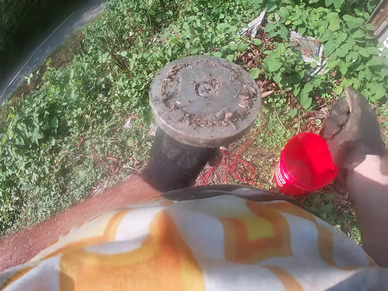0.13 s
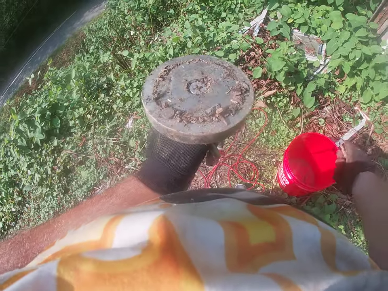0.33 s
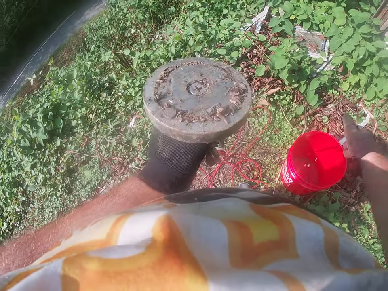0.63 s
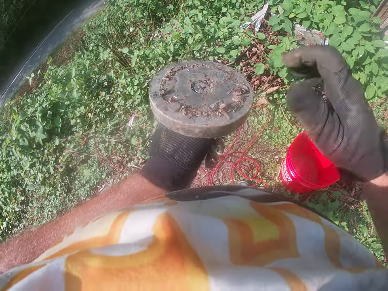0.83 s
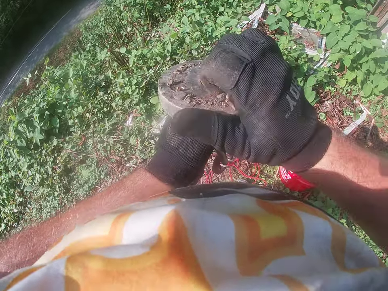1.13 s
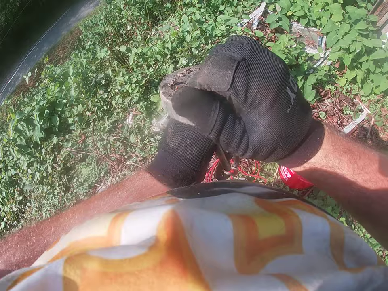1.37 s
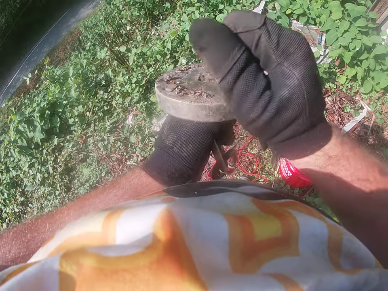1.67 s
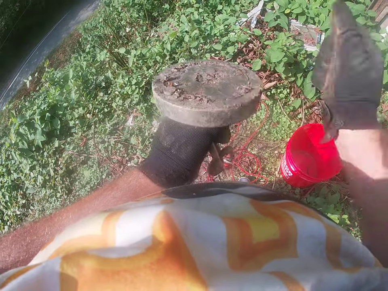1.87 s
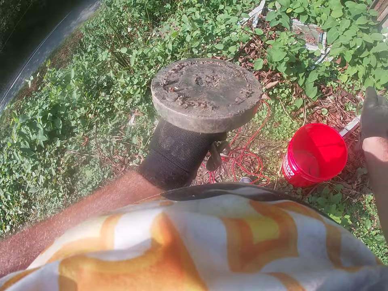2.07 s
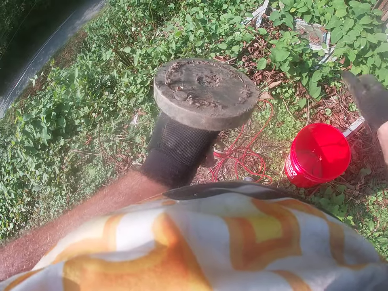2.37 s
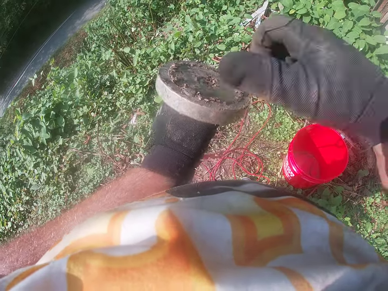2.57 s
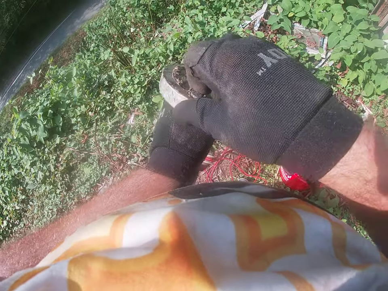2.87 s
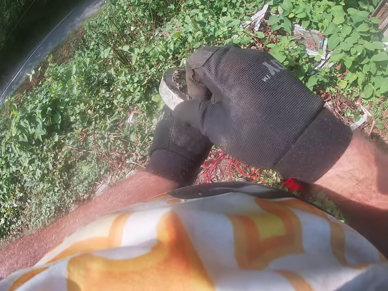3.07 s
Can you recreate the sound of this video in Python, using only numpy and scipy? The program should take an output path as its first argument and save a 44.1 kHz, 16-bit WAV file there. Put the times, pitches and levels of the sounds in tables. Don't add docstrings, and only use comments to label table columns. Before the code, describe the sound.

Metal scraps clattering into a plastic bucket. Wind thumps low on a body-worn microphone over faint distant traffic and leaves. At 0.5 s a brief scrape and bright ticks; at 0.8 s a handful hits with hard cracks and a short hollow ring, scattering until about 1.1 s. Soft gritty rasps and small clicks run 1.2-1.8 s, then a lull. Around 2.5 s a second handful crashes and bounces; stragglers tick until 3.15 s.

```python
import sys
import numpy as np
from scipy import signal
from scipy.fft import rfft, irfft
from scipy.io import wavfile
from scipy.ndimage import uniform_filter1d

SR = 44100
rng = np.random.default_rng(int(sys.argv[2]) if len(sys.argv) > 2 else 0)


def invert_db(level):
    return 10 ** (np.asarray(level, dtype=float) / 20)


def log_audio(samples):
    frames = np.atleast_2d(samples).T
    limited = np.clip(frames, -1, 1)
    pcm = np.round(limited * 32767).astype(np.int16)
    wavfile.write(sys.argv[1], SR, pcm)


N = 141120

# frequency in Hz, density in dB per Hz.
AIR_SPECTRUM = [(100, -10.5), (250, -4.5), (420, 4), (600, -4.5), (1200, -10), (2500, -15), (6000, -21),
                (10500, -19.5), (13000, -26.5)]
# time in seconds, level in dB.
GUST_LEVEL = [(0, -44), (.12, -34.5), (.3, -32), (.47, -35), (.68, -44.5), (.8, -25.5), (1.0, -39),
              (1.15, -36), (1.22, -57), (1.38, -52.5), (1.41, -43), (1.7, -29.5), (1.93, -35), (2.25, -34),
              (2.4, -32), (2.58, -35), (2.75, -25), (3.2, -50)]
# frequency in Hz, density in dB per Hz.
WIND_SPECTRUM = [(12, -33), (25, 5), (60, 1), (120, -6.5), (220, -15), (330, -26), (600, -58.5)]
# centre in seconds, peak in dB, pitch in Hz.
EDDIES = [(0.161, -14.5, 54), (0.181, -17.5, 121), (0.232, -23.5, 73.6), (0.282, -12.5, 78.4),
          (.304, -15, 122), (0.498, -20, 64), (0.517, -12, 121), (0.591, -23, 70), (0.821, -12.5, 128),
          (0.917, -20.5, 168), (0.941, -17, 57.6), (1.093, -25, 58), (1.542, -28.5, 94), (1.569, -23, 90),
          (1.65, -18.5, 109), (1.737, -14.5, 101), (1.78, -15.5, 62), (1.839, -19.5, 75.4),
          (1.965, -27.5, 203), (2.014, -19, 80), (2.127, -14.5, 143), (2.209, -19, 73), (2.301, -24, 180.6),
          (2.415, -25, 70), (2.657, -15, 156), (2.678, -16, 273), (2.722, -9, 76.4), (2.746, -14, 142),
          (2.765, -10.5, 71), (2.88, -20.5, 100), (3.13, -31.5, 46)]
# start in seconds, length in seconds, level in dB, brightness in dB.
STROKES = [(0.494, 0.02, -34, 2), (1.164, 0.14, -44.5, -1), (1.306, 0.12, -45.5, 4.5),
           (1.455, 0.1, -45, 0.5), (1.563, 0.24, -44.5, -6.5), (1.723, .12, -46.5, -2.5),
           (1.8, 0.22, -58, 5), (2.34, 0.41, -64, 13), (2.557, 0.156, -44.5, -11),
           (2.81, 0.042, -57.5, 9.5), (2.922, 0.035, -55.5, 16), (1.48, 0.042, -47.5, 8),
           (3.132, 0.041, -47, 8)]
# frequency in Hz, density in dB per Hz.
RASP_SPECTRUM = [(300, 7.5), (1000, -7.5), (1700, -7.5), (2700, 4), (4500, -1), (7000, -8), (9700, 0),
                 (12500, -1)]
# start in
# seconds, pitch in Hz, peak in dB, T60 in seconds.
PINGS = [(.4996, 2390, -25.5, 0.016), (.4996, 4900, -25.5, 0.022), (0.499, 7660, -28, .03),
         (.8125, 783, -13, 0.044), (.8464, 4530, -21, .015), (2.541, 630, -23, .04),
         (2.65, 1010, -29, 0.023), (2.7, 1010, -30.5, 0.026), (0.8116, 2690, -6.5, 0.013),
         (.8112, 7500, -9.5, 0.0063), (.8203, 7700, -19, 0.0092), (0.829, 7600, -26, 0.019),
         (.8494, 2900, -22, 0.013), (0.9537, 1214, -21.5, 0.034), (0.952, 3650, -22.5, 0.017),
         (1.3288, 2570, -36, 0.022), (1.4012, 5550, -34, 0.022), (1.678, 3830, -42, 0.011),
         (1.49, 8000, -45, .02), (2.482, 1520, -23.5, 0.032), (2.4816, 2550, -26, 0.03),
         (2.4812, 4680, -25.5, 0.025), (2.5299, 7420, -11.5, .008), (2.539, 2280, -5.5, .012),
         (2.589, 1610, -25, 0.029), (2.716, 6800, -43, 0.013), (2.787, 3500, -44, .015),
         (3.152, 1300, -34.5, 0.039), (3.154, 5500, -38, .02)]
# start in seconds, peak in dB,
# brightness in dB.
TICKS = [(0.4992, -21.5, 6), (0.4973, -25.5, 9.5), (0.5051, -25, 8), (.5118, -41, -1), (0.6907, -30.5, -10),
         (1.1726, -40, -7), (1.1762, -23, -9), (1.2268, -32, -5), (1.3, -24.5, -8), (1.3286, -19.5, -10),
         (1.364, -17.5, -16), (1.4016, -13, -17), (1.4602, -26, -16), (1.489, -30.5, -7), (1.508, -30.5, 4),
         (1.517, -32, -9), (1.3905, -46, -6), (1.181, -45, -4), (1.534, -28.5, -28), (1.6028, -27, -25),
         (1.6805, -26, -23), (1.72, -23, -29), (1.798, -30, -14), (2.481, -11.5, -10.5), (2.5224, -24, -7),
         (2.714, -30.5, -3.5), (2.722, -19.5, -12), (2.7856, -30, -24), (2.821, -29, -13),
         (2.8964, -53, 10), (2.925, -44, 5), (3.139, -33, -29), (3.1506, -26.5, -3.5)]
# frequency in Hz, density in dB per Hz.
METAL_SPECTRUM = [(300, -40), (900, 4.5), (1500, 0.5), (2800, 2.5), (3600, -3.5), (4500, -1), (6000, -8),
                  (15000, -1)]
# start in seconds, crack peak in dB, bucket ring in dB,
# brightness in dB, boom of the low modes in dB.
STRIKES = [(0.8109, 0.5, -2.5, -21.5, -0.5), (0.8128, -9, -30, -30, -2), (0.82, -12, -6.5, -5.5, -13),
           (0.8272, -13, -15, -8, -8), (0.8293, -24, -31, -13, -4), (0.8476, -0.5, -27, -27, -1),
           (0.8494, -4.5, -12, -23, 2), (0.854, -18.5, -16, -21, -3), (0.8558, -2, -17, -12.5, -3),
           (0.8637, -24, -21, -21, 1), (0.8777, -10, -13, -32, 2), (0.885, -9, -12.5, -36, 7),
           (0.8997, -17, -21.5, -26, -9), (0.9112, -22, -29.5, -28, 7), (0.926, -22, -30, -22, 4),
           (0.9523, -13.5, -18, -30, -5), (0.9608, -20, -27.5, -25, -14), (1.0384, -25, -42, -25, -5),
           (1.0798, -41, -36, -25, 5), (2.529, -10, -17.5, -5.5, -8), (2.5369, -7, -23, -0.5, 1),
           (2.5391, -4.5, -17, -18, -2.5), (2.5442, -3, -10, -8.5, 4), (2.5509, -7, -41, -4.5, -7),
           (2.5547, -18, -24, -10, -3), (2.5585, -14, -18, -18, -6), (2.5629, -7.5, -24, -8.5, 3),
           (2.5674, -14, -28, -17, -11), (2.5885, -11, -27, -21, -16), (2.596, -12, -30, -18, -4),
           (2.6014, -18.5, -33, -13, -8), (2.6144, -23, -32, -25, -3), (2.6248, -24, -28, -17, 2),
           (2.6486, -20, -26, -22, -3), (2.6555, -19, -31, -28, -10), (2.6767, -24, -37, -20, -9),
           (2.6987, -18, -27, -38, -2), (2.739, -29, -30, -27, 9)]
# frequency in Hz, level in dB, T60 in seconds.
BUCKET_MODES = [(216, -7, 0.2), (408, -0.5, 0.054), (580, -3.5, 0.039), (610, -12.5, 0.11),
                (796, -6, 0.051), (892, -14, 0.091), (982, -2.5, 0.042), (1125, -7.5, 0.07),
                (1282, -1, 0.065), (1472, -10.5, 0.04), (1607, -12.5, 0.03), (1974, -12, 0.044),
                (2920, -7.5, 0.026)]
# frequency in Hz, gain in dB.
SIDE_RESPONSE = [(1000, -24), (8000, -12.5), (11000, -5), (13000, 14)]
# frequency in Hz, gain in dB.
MIC_RESPONSE = [(6800, -2.5), (7750, -1), (8750, -10), (9750, -10), (10900, -22.5), (12700, -35.5),
                (14200, -26), (15700, -63)]


def colour(x, points):
    hz, db = np.transpose(points)
    grid = np.maximum(np.arange(4097) * SR / 8192, 1)
    log_magnitude = np.interp(np.log(grid), np.log(hz), db) * np.log(10) / 20
    cepstrum = irfft(log_magnitude)
    cepstrum[1:4096] *= 2
    cepstrum[4097:] = 0
    impulse_response = irfft(np.exp(rfft(cepstrum)))
    return signal.fftconvolve(x, impulse_response)[:len(x)]


def unit(x):
    return x / np.sqrt(np.mean(x ** 2))


def drift(rate_hz):
    pole = np.exp(-2 * np.pi * rate_hz / SR)
    wander = signal.lfilter([1], [1, -2 * pole, pole * pole], rng.standard_normal(N + SR))
    return unit(wander[SR:])


def butter(x, order, hz, kind):
    return signal.sosfilt(signal.butter(order, hz, kind, fs=SR, output="sos"), x)


def two_tone(dull, bright, points):
    split_hz = 4580
    scale = np.linalg.norm(colour(signal.unit_impulse(8192), points))
    both = butter(dull, 2, split_hz, "low") + butter(bright, 3, split_hz, "high")
    return colour(both, points) / scale


def grit():
    grains_per_s, spread_db, hiss = 3000, 3, 1.6
    sizes = invert_db(spread_db * np.minimum(rng.exponential(1, N), 4)) * rng.standard_normal(N)
    struck = rng.random(N) < grains_per_s / SR
    return unit(sizes * struck + hiss * rng.standard_normal(N))


def air():
    flutter = invert_db(0.7 * drift(4))
    return invert_db(-48) * flutter * unit(colour(rng.standard_normal(N), AIR_SPECTRUM))


def wind():
    trim_db, lump_db, lumps_per_s = 3, 3, 25
    eddy_cycles, second_harmonic = 0.51, 0.21
    t = np.arange(N) / SR
    level_db = np.interp(t, *np.transpose(GUST_LEVEL)) + trim_db + lump_db * drift(lumps_per_s)
    out = unit(colour(rng.standard_normal(N), WIND_SPECTRUM)) * invert_db(level_db)
    for s, db, hz in EDDIES:
        turns = (t - s) * hz
        envelope = np.exp(-0.5 * (turns / eddy_cycles) ** 2)
        swing = np.cos(2 * np.pi * turns) + second_harmonic * np.cos(4 * np.pi * turns)
        out += invert_db(db) * envelope * swing
    return out


def glove():
    edge = 0.18
    dull, bright, t = np.zeros(N), np.zeros(N), np.arange(N) / SR
    for s, length, db, bright_db in STROKES:
        progress = (t - s) / length
        shape = invert_db(db) * np.clip(np.minimum(progress, 1 - progress) / edge, 0, 1)
        dull += shape
        bright += shape * invert_db(bright_db)
    uneven = invert_db(2.2 * drift(60))
    return two_tone(grit() * dull * uneven, grit() * bright * uneven, RASP_SPECTRUM)


def pings():
    out, age = np.zeros(N + SR), np.arange(SR // 10) / SR
    for s, hz, db, t60 in PINGS:
        wobble = 1 + 4 * uniform_filter1d(rng.standard_normal(len(age)), size=40)
        ring = invert_db(db - 60 * age / t60) * np.sin(2 * np.pi * hz * age)
        out[int(s * SR):][:len(age)] += wobble * ring
    return out[:N]


def clicks(rows, tail_s):
    crack_t60_s, tail_db, snap_db, trim_db, bright_trim_db = 0.0052, -11.5, 3, -6, 11
    power, snaps = np.zeros((2, N + SR)), np.zeros((2, N))
    age = np.arange(SR // 4) / SR
    decay = invert_db(-60 * age / crack_t60_s) + invert_db(tail_db - 60 * age / tail_s)
    for s, db, bright_db in rows:
        at = int(s * SR)
        gains = invert_db(db + trim_db + np.array([0, bright_db + bright_trim_db]))
        power[:, at:at + SR // 4] += (gains[:, None] * decay) ** 2
        snaps[:, at + 20] += gains * invert_db(snap_db)
    dull, bright = np.sqrt(power[:, :N]) * rng.standard_normal((2, N)) + snaps
    return two_tone(dull, bright, METAL_SPECTRUM)


def ticks():
    return butter(clicks(TICKS, tail_s=0.07), 2, 910, "high")


def strikes():
    return clicks([(s, db, bright_db) for s, db, _, bright_db, _ in STRIKES], tail_s=0.091)


def bucket():
    level_db, spread_db, boom_below_hz, most_cycles = -9.5, 2.5, 700, 65
    chatter_db, chatter_t60_s = -27.5, 0.09
    s, _, ring_db, _, boom_db = np.transpose(STRIKES)
    at, out = (s * SR).astype(int), np.zeros(N)
    luck_db = spread_db * rng.standard_normal((len(s), len(BUCKET_MODES)))
    crumbs = np.zeros(N)
    crumbs[at] = invert_db(ring_db + chatter_db)
    crumb_decay = invert_db(-60 / (chatter_t60_s * SR))
    chatter = signal.lfilter([1], [1, -crumb_decay], crumbs + 1e-18) * grit()
    for k, (hz, db, t60) in enumerate(BUCKET_MODES):
        sign = (-1) ** k
        kicks = chatter * sign
        kicks[at] += invert_db(ring_db + luck_db[:, k] + boom_db * (hz < boom_below_hz)) * sign
        radius = invert_db(-60 / (min(t60, most_cycles / hz) * SR))
        angle = 2 * np.pi * hz / SR
        poles = [1, -2 * radius * np.cos(angle), radius * radius]
        out += signal.lfilter([0, np.sin(angle)], poles, kicks) * invert_db(db + level_db)
    return butter(out, 2, 2520, "low")


def side_reflection(metal):
    return invert_db(-15) * colour(np.roll(metal, SR // 330), SIDE_RESPONSE)


def scene():
    metal = glove() + pings() + ticks() + strikes()
    mid = air() + wind() + metal + bucket()
    side = side_reflection(metal)
    return np.array([mid + side, mid - side])


def band_limit(x):
    return signal.sosfilt(signal.butter(12, 15940, fs=SR, output="sos"), x)


def record(dry):
    headroom = 2.5
    heard = np.array([colour(channel, MIC_RESPONSE) for channel in dry])
    mix = headroom * np.tanh(heard / headroom)
    return band_limit(mix)


dry = scene()
out = record(dry)
log_audio(out)
```